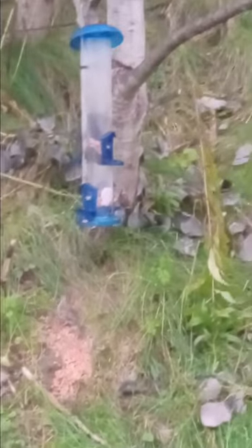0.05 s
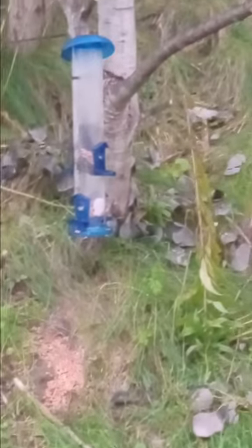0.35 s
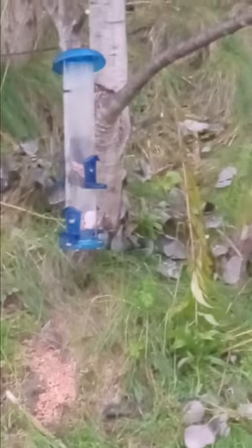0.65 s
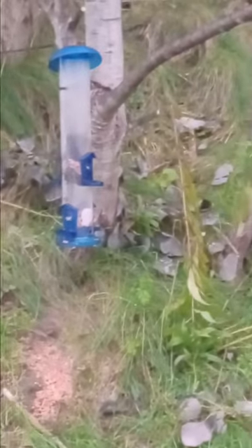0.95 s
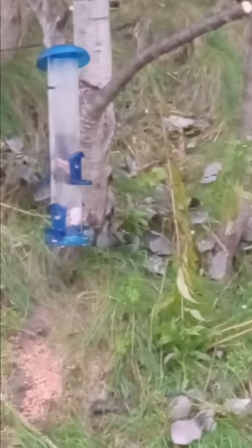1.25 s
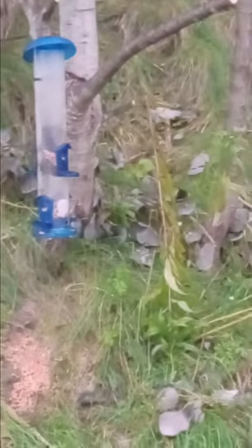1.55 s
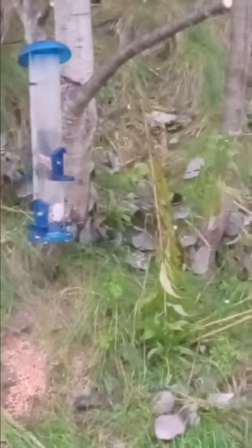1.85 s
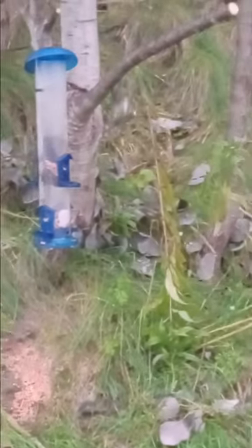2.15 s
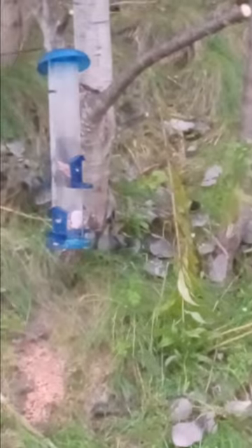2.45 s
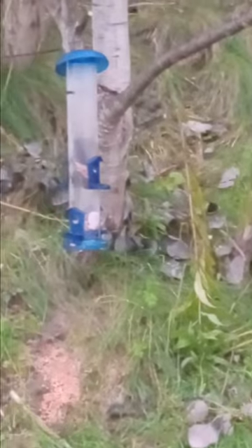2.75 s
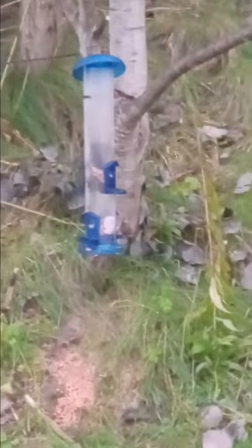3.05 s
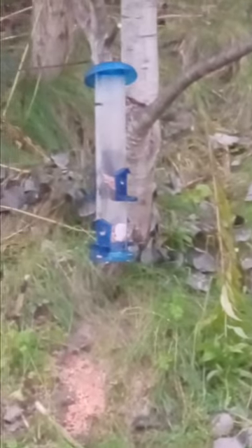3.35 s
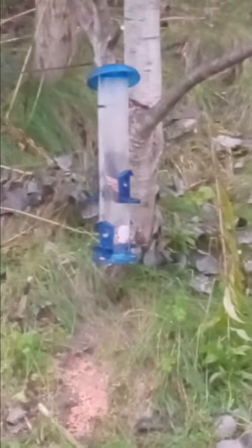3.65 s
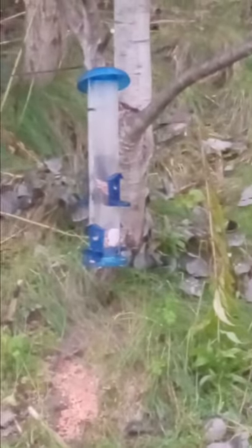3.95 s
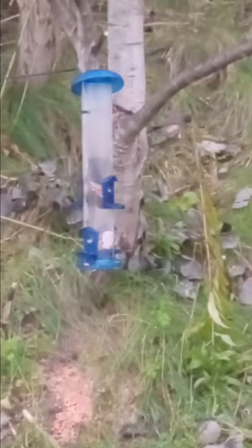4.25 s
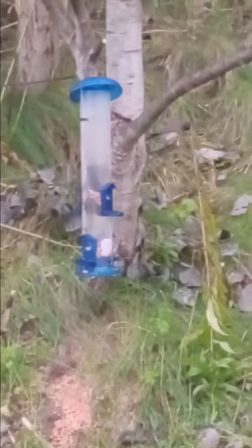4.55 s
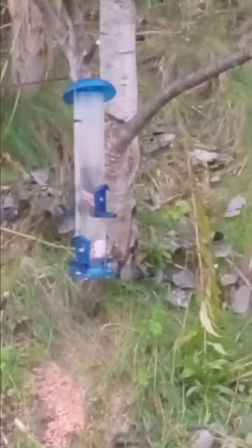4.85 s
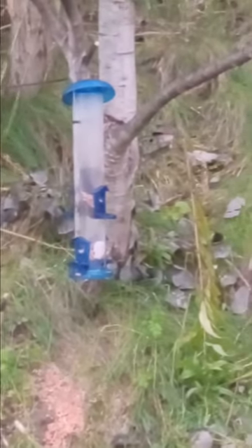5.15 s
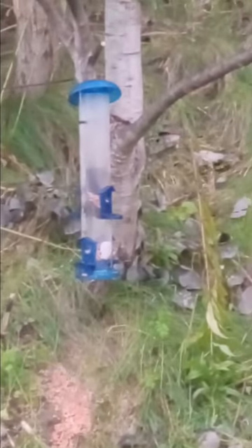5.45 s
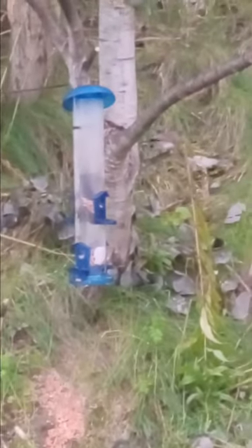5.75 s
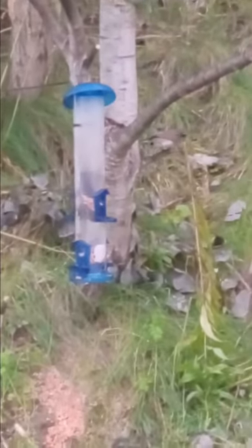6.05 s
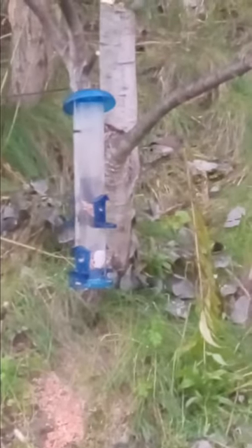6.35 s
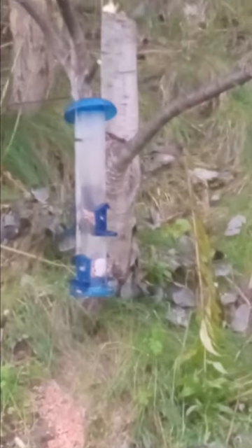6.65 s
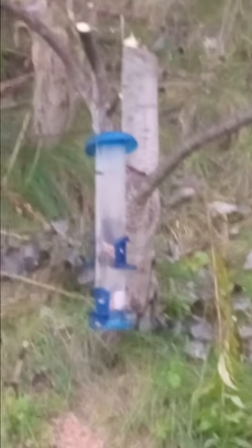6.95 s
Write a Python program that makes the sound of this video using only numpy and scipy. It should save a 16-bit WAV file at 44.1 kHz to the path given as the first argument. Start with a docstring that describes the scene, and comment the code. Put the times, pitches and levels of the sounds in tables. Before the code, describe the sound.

Small wild birds call in a backyard over soft outdoor air and a faint low hum. A thin, high, swooping chip sounds close by at 0.3 seconds and another at 1.1, followed by two wavering whistles up to 1.5. At about 1.9 seconds a sharp, whip-like snap, the loudest moment, opens a jumbled, buzzy bird phrase lasting until 2.4. The calls carry a short echo from the trees. From about 2.4 seconds wind throbs on the microphone in low, uneven pulses, strongest from 5.8 to the end at 7. Single chips come at 3.1 seconds and, louder, at 5, with faint calls from deeper in the trees between and after them. Two clearer short whistles follow around 6.5 seconds. Tiny twig ticks are scattered throughout, and a few light, woody pecks sound near 3.1 and between 6 and 6.8 seconds.

```python
"""Small birds call round a backyard feeder: thin swooping chips, wavering whistles, one jumbled, buzzy
phrase opened by a snap, and calls from deeper in the trees. Each note is a gliding tone, most shaken by
a fast trill; trees and walls scatter them. A few light pecks and twig ticks ring as short noise bursts.
Wind throbs low on the microphone over a faint hum, a far whirr and the wash of the outdoors."""
import sys
import numpy as np
from scipy import signal
from scipy.fft import rfft, irfft, next_fast_len
from scipy.io import wavfile
from scipy.ndimage import uniform_filter1d

SR = 44100
rng = np.random.default_rng(int(sys.argv[2]) if len(sys.argv) > 2 else 0)


def to_wav(sig):
    """Store sig (one row per channel, or 1-D mono) as 16-bit WAV at the path in sys.argv[1].

    Samples outside -1..1 are clipped; the rate is SR.
    """
    pcm = np.clip(np.atleast_2d(sig), -1, 1) * 32767
    pcm = np.round(pcm).astype(np.int16)
    wavfile.write(sys.argv[1], SR, pcm.T)  # frames by channels


N = 309141
TIME = np.arange(N) / SR
RIGHT_LEAD_SAMPLES = 48

# chips: (start [s], length [s], bottom pitch [Hz], swoop down [Hz], hook up [Hz], level [dB])
CHIPS = [(.318, .054, 7640, 3730, 1404, -38), (1.104, 0.025, 6580, 2810, -2, -40.5),
         (3.090, .062, 6620, 3980, 1900, -38), (4.974, .068, 6794, 2720, 1500, -30.5)]


def chips():
    """Thin, swooping chips from close by."""
    song = sing(CHIPS, chip, trill_hz=195, jitter=.21, flutter=.46, rasp=.4, flick=.79)
    return yard(song, early_db=-7, tail_db=-1.5, right_tail_db=5.5)


def chip(start, length, bottom_hz, swoop_hz, hook_hz, db):
    """Contour: the pitch swoops down as the level grows, rests, then hooks up as it fades."""
    glide_s, attack_s, depth_hz = .008, .0092, 68
    t = np.arange(int(length * SR)) / SR
    swoop, hook = np.exp(-t / glide_s), np.exp((t - length) / glide_s)
    level_db = db - 27 * np.exp(-(t / attack_s) ** 4) - 15 * hook ** .68
    return start, bottom_hz + swoop_hz * swoop + hook_hz * hook, level_db, depth_hz


# whistled notes: (start [s], length [s], first pitch [Hz], last pitch [Hz], level [dB],
# nominal trill depth [Hz], attack [s])
WHISTLES = [(1.127, 0.061, 6650, 6720, -49, 218, 0.045), (1.167, 0.0853, 6620, 6970, -42, 190, 0.031),
            (1.355, 0.083, 7060, 7120, -48, 211, 0.037), (1.421, 0.11, 6970, 7560, -50.5, 338, 0.014)]


def whistles():
    """Two wavering whistles from close by, each of two overlapping notes."""
    song = sing(WHISTLES, note, trill_hz=172, jitter=.2, flutter=.5, rasp=.5, flick=.4)
    return yard(song, early_db=-7, tail_db=-1.5, right_tail_db=5.5)


def note(start, length, first_hz, last_hz, db, depth_hz, attack_s):
    """Contour: the pitch slides and settles while the level swells to its peak and fades."""
    progress = np.linspace(0, 1, int(length * SR))
    peak = np.clip(attack_s / length, .02, .98)
    rise_db = -15.5 * np.maximum(1 - progress / peak, 0) ** 2
    fall_db = -9.5 * np.maximum(progress - peak, 0) / (1 - peak)
    hz = last_hz + (first_hz - last_hz) * (1 - progress) ** 2.6
    return start, hz, db + rise_db + fall_db, depth_hz


# very fast downward sweeps: columns as WHISTLES
SNAP = [(1.8775, 0.0019, 9650, 7980, -30.5, 0, .001), (1.8794, 0.0026, 8800, 5350, -19, 0, .0009),
        (1.8812, 0.0024, 7140, 6370, -15, 0, .0009), (1.8814, 0.0021, 4870, 3270, -27.5, 0, 0.00118),
        (1.8835, .005, 3210, 1950, -34, 0, 0.0009)]
# overlapping buzzy notes: columns as WHISTLES
PHRASE = [(1.96, .14, 5760, 5334, -45.5, 187, 0.013), (1.98, 0.11, 3560, 3500, -54, 75, 0.011),
          (1.94, 0.13, 4220, 3837, -49, 659, 0.069), (1.96, 0.11, 6900, 6800, -54.5, 218, 0.027),
          (1.97, 0.06, 4770, 4600, -67, 370, .04), (2.115, 0.26, 5604, 5925, -47, 330, 0.07),
          (2.162, 0.12, 4770, 4750, -51.5, 440, 0.042), (2.135, .13, 3700, 3950, -53.5, 270, 0.059),
          (2.15, 0.11, 7400, 6540, -61, 280, 0.079), (2.19, 0.14, 3350, 3456, -56.5, 362, 0.026),
          (2.32, .078, 6380, 6150, -40.5, 370, 0.01)]


def phrase():
    """A whip-like snap opens a jumble of rasping tones, several sounding at once."""
    snap = sing(SNAP, note)
    buzz = sing(PHRASE, note, trill_hz=222, jitter=.15, flutter=.35, rasp=.7, flick=.2)
    return (yard(snap, early_db=0, tail_db=-6.5, right_tail_db=1.5)
            + yard(buzz, early_db=-5.5, tail_db=-4, right_tail_db=4))


# distant notes: columns as WHISTLES
FAR_CALLS = [(.865, 0.055, 7250, 7120, -79, 90, 0.018), (3.6, 0.11, 1832, 1933, -67, 32.2, 0.073),
             (3.785, 0.044, 5730, 6020, -65, 303, 0.021), (3.98, .19, 6460, 6740, -92, 50, 0.057),
             (4.16, 0.73, 7100, 7420, -77, 40, 0.22), (4.6, 0.097, 7310, 7580, -67, 120, 0.028),
             (4.81, 0.054, 3170, 3290, -64, 90, 0.0073), (5.41, 0.11, 7000, 7270, -79, 121.1, 0.0297),
             (5.83, .07, 6820, 7180, -69.5, 330, .015), (6.468, 0.12, 6490, 6834, -49.5, 120, 0.049),
             (6.49, .08, 4010, 4240, -63.5, 49.8, 0.063), (6.596, 0.0785, 5850, 6030, -48, 130, 0.026),
             (6.605, .09, 3660, 3805, -68, 45.6, 0.025)]


def far_calls():
    """Birds deeper in the trees."""
    song = sing(FAR_CALLS, note, trill_hz=165, jitter=.3, flutter=.49, rasp=.32, flick=.097)
    return yard(song, early_db=-3.5, tail_db=-5.5, right_tail_db=5.5)


def sing(rows, contour, trill_hz=0, jitter=0, flutter=0, rasp=0, flick=0):
    """A near-pure tone follows each contour; a fast, uneven trill shakes its pitch and loudness."""
    trill_turns = np.cumsum(trill_hz * (1 + jitter * band(0, 120))) / SR
    trill = np.sin(2 * np.pi * trill_turns) + rasp * band(0, 350)
    trill = 2 * np.tanh(trill / 2)  # the membrane can only stretch so far
    trill += flick * trill ** 2  # pitch flicks up more easily than down
    out = np.zeros(N)
    for row in rows:
        start, hz, db, depth_hz = contour(*row)
        shake = trill[int(start * SR):][:len(hz)]
        phase = 2 * np.pi * np.cumsum(hz + depth_hz * shake) / SR
        loudness = amp(db) * (1 - flutter * np.tanh(depth_hz / 300) * np.tanh(shake))
        soft_edges = signal.windows.tukey(len(hz), .074 + .0027 * SR / len(hz))
        add(out, start, loudness * np.sin(phase) * soft_edges)
    return out


# light pecks: (time [s], level [dB])
PECKS = [(3.097, -53.5), (6.089, -55), (6.291, -63.5), (6.598, -62), (6.816, -61.5)]
# twig ticks: (time [s], pitch [Hz], level [dB])
TICKS = [(.579, 6400, -66.5), (1.115, 8200, -73), (1.622, 7110, -63.5), (3.389, 7400, -57.5),
         (3.504, 6900, -68), (4.468, 6360, -63), (4.695, 5500, -69.5), (6.428, 7500, -66.5)]


def pecks_and_ticks():
    """Pecks with a woody ring, bright twig ticks, and fainter ticks scattered at random."""
    tick_decay_s, faint_per_s = .0022, 1.1
    out = np.zeros(N)
    for s, db in PECKS:
        add(out, s, amp(db) * burst(hz=3670, width_hz=520, decay_s=.0033))
    for s, hz, db in TICKS:
        add(out, s, amp(db) * burst(hz, width_hz=1200, decay_s=tick_decay_s))
    faint = (rng.random(N) < faint_per_s / SR) * amp(-81.5)
    out += signal.oaconvolve(faint, burst(hz=5380, width_hz=5500, decay_s=tick_decay_s))[:N]
    return yard(out, early_db=-18, tail_db=-16.5, right_tail_db=12)


def burst(hz, width_hz, decay_s):
    """Noise in one band that dies within milliseconds."""
    size = 4096
    t, f = np.arange(size) / SR, np.fft.rfftfreq(size, 1 / SR)
    resonance = 1 / (1 + (1.16 * (f - hz) / width_hz) ** 2) ** 2
    noise = unit_rms(irfft(rfft(rng.standard_normal(size)) * resonance))
    return noise * (t / decay_s) * np.exp(1 - t / decay_s)


# decay of the scattered tail: (frequency [Hz], T60 [s])
TAIL_T60 = [(2000, 0.47), (4000, 0.41), (7000, 0.28), (8200, 0.27), (10000, 0.22)]


def yard(x, early_db, tail_db, right_tail_db):
    """Direct sound, a few echoes from ground and trunks, and a scattered tail from the trees."""
    size = SR // 2
    t = np.arange(size) / SR

    def reflections(per_s, after_s):
        return rng.choice([-1., 1.], (2, size)) * (rng.random((2, size)) < per_s / SR) * (t > after_s)

    early = reflections(per_s=900, after_s=.0015) * np.exp(-t / .0077)
    hz, frame_s, spectra = signal.stft(reflections(per_s=2000, after_s=.012), SR, nperseg=256)
    decay = amp(-60 * frame_s / curve(TAIL_T60, hz)[:, None])
    tail = signal.istft(spectra * decay, SR, nperseg=256)[1][:, :size]
    early, tail = (h / np.linalg.norm(h, axis=1, keepdims=True) for h in (early, tail))
    echoes = amp(early_db) * early + amp(tail_db) * tail * amp([[0], [right_tail_db]])
    return ports(x, right_db=0) + signal.fftconvolve(x[None], echoes, axes=1)[:, :N]


# right port response: (frequency [Hz], gain [dB])
RIGHT_PORT = [(2000, -14), (3600, -18), (5500, -9.5), (6400, -21), (7000, -25.5), (7800, -19), (10000, 14)]


def shadow(pair):
    """The device's body shades the right port, most near 7 kHz; the highest treble is lifted."""
    size = next_fast_len(N)
    gain = amp(curve(RIGHT_PORT, np.fft.rfftfreq(size, 1 / SR)))
    right = irfft(rfft(pair[1], size) * gain, size)
    return np.array([pair[0], right[:N]])


# strong wind throbs: (start [s], length [s], level [dB])
THROBS = [(0.724, 0.14, -51), (1.513, 0.076, -45.5), (1.916, 0.072, -47.5), (2.249, 0.051, -46),
          (2.416, 0.15, -38.5), (2.608, 0.19, -36.5), (2.802, 0.22, -34), (3.047, 0.22, -35.5),
          (3.218, 0.28, -41.5), (3.526, 0.19, -39), (3.766, 0.21, -37), (3.954, .24, -41),
          (4.186, .13, -45.5), (4.295, .14, -37), (4.5, 0.19, -45), (4.719, 0.23, -38.5),
          (5.129, 0.11, -40), (5.347, .21, -42.5), (5.543, 0.27, -40.5), (5.77, .19, -33.5),
          (6.045, .2, -33.5), (6.297, 0.21, -31.5), (6.565, 0.18, -31.5), (6.802, 0.21, -31)]


def wind():
    """Swells of air pressure, heard through the narrow bass range that the microphone lets pass."""
    puff_db = -55 - .56 * TIME  # weak puffs give way to the throbs
    strength = amp(puff_db) * np.maximum(band(0, 6.2), 0)
    for s, length, db in THROBS:
        add(strength, s, amp(db) * np.sin(np.linspace(0, np.pi, int(length * SR))))
    pitch_hz = 79.9 - .45 * TIME + 1.265 * band(0, 9.2)
    eddies = amp(-16) * band(78, 31) + amp(-29) * band(150, 70)
    throb = np.sin(2 * np.pi * np.cumsum(pitch_hz) / SR) + eddies
    return ports(strength * throb, right_db=-10.5)


# hum lines: (frequency [Hz], rms level before swell [dB])
HUM_LINES = [(81, -68.5), (120, -62.5), (180, -75), (308, -78)]
# hum swell: (time [s], gain of the lines [dB], level of a separate 151 Hz line [dB])
HUM_SWELL = [(0, 2.5, -77), (0.998, -2, -80), (2.2, -2, -75.5), (2.8, 4.5, -76.5), (4, 3.5, -73.5),
             (4.8, -0.5, -70.5), (5.299, -0.5, -83), (6.1, 2, -62), (7, -1, -57.5)]


def hum():
    """Faint low tones waver, swell and fade."""
    s, swell_db, separate_db = np.transpose(HUM_SWELL)
    lines = sum(amp(db) * np.sqrt(2) * np.sin(2 * np.pi * hz * TIME + .15 * band(0, 11))
                for hz, db in HUM_LINES)
    lines *= amp(np.interp(TIME, s, swell_db))
    separate = amp(np.interp(TIME, s, separate_db)) * np.sin(2 * np.pi * 151 * TIME + .34 * band(0, 5.7))
    return ports(lines + separate, right_db=-9)


# whirr surges: (time [s], rise [dB])
WHIRR_SURGES = [(.35, 10), (1.97, 11), (2.85, 12.5), (4.25, 10), (5.0, 11.5)]


def whirr():
    """A narrow band of noise from far off flickers at random and surges at set times."""
    surge_s = .047
    surge_db = sum(db * np.exp(-((TIME - s) / surge_s) ** 2) for s, db in WHIRR_SURGES)
    level_db = -75.5 + surge_db + 3.5 * band(0, 31)
    return ports(amp(level_db) * band(hz=897, width_hz=31), right_db=-9)


# outdoor wash: (frequency [Hz], base density [dB/Hz])
WASH = [(20, -102), (38, -93.5), (55, -85.5), (80, -74), (140, -85), (220, -89.5), (450, -92.5), (580, -99),
        (780, -93.5), (1800, -96), (2150, -105), (4800, -114), (7100, -112), (8300, -135), (16000, -145)]
# likeness of the wash at the two ports: (frequency [Hz], coherence [0..1])
COHERENCE = [(60, 0.78), (150, 0.89), (350, 1), (700, 0.27), (1400, 0.07), (3000, 0.15), (8000, 0.13)]
# microphone hiss: (frequency [Hz], right channel density [dB/Hz])
HISS = [(100, -123), (6000, -124), (8000, -135), (9500, -131), (13700, -135), (15200, -119), (16000, -119)]


def air():
    """The outdoor wash drifts in soft patches; the microphones add their own hiss."""
    size, hop = 2048, 512
    hz = np.fft.rfftfreq(size, 1 / SR)
    shape = (4, N // hop + 5, len(hz))
    left, unshared, left_hiss, right_hiss = rng.standard_normal(shape) + 1j * rng.standard_normal(shape)
    drift = uniform_filter1d(rng.standard_normal(left.shape), size=9, axis=0)
    patches_db = 1.49 * unit_rms(uniform_filter1d(drift, size=18, axis=1))
    coherence = curve(COHERENCE, hz)
    right = coherence * left + np.sqrt(1 - coherence ** 2) * unshared
    right *= amp(-11) * np.exp(2j * np.pi * hz * RIGHT_LEAD_SAMPLES / SR)
    wash = np.array([left, right]) * amp(curve(WASH, hz) + patches_db)
    hiss = np.array([left_hiss * amp(-8), right_hiss]) * amp(curve(HISS, hz))
    spectra = (wash + hiss) * np.sqrt(1.5 * SR / size)
    return signal.istft(spectra, nperseg=size, noverlap=size - hop, time_axis=1, freq_axis=2)[1][:, :N]


def ports(x, right_db):
    """The right microphone port hears the sound earlier, with a gain of its own."""
    return np.array([x, amp(right_db) * np.roll(x, -RIGHT_LEAD_SAMPLES)])


def band(hz, width_hz):
    """Unit noise in a bell-shaped band; round 0 Hz, a random drift."""
    size = next_fast_len(N)
    bell = np.exp(-((np.fft.rfftfreq(size, 1 / SR) - hz) / width_hz) ** 2)
    return unit_rms(irfft(rfft(rng.standard_normal(size)) * bell, size)[:N])


def curve(points, hz):
    """Interpolate over log frequency."""
    f, value = np.transpose(points)
    return np.interp(np.log(hz + 1), np.log(f + 1), value)


def amp(db):
    return 10 ** (np.asarray(db) / 20)


def unit_rms(x):
    return x / np.sqrt(np.mean(x ** 2) + 1e-20)


def add(mix, start_s, sound):
    part = mix[max(round(start_s * SR), 0):][:len(sound)]
    part += sound[:len(part)]


def scene():
    birds = chips() + whistles() + phrase() + far_calls()
    return shadow(birds + pecks_and_ticks()) + wind() + hum() + whirr() + air()


def record(dry):
    """The recorder's band limit."""
    cutoff_hz = 15750
    lowpass = signal.firwin(511, cutoff_hz, window=("kaiser", 9), fs=SR)
    return signal.oaconvolve(dry, lowpass[None], "same")


dry = scene()
out = record(dry)
to_wav(out)
```